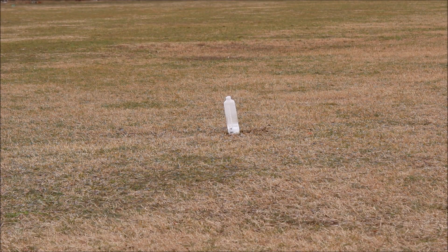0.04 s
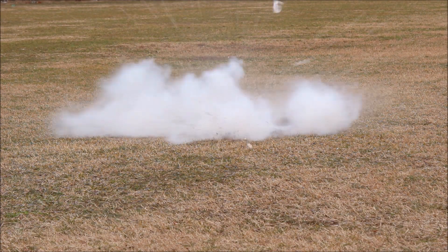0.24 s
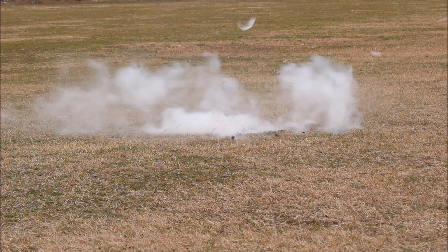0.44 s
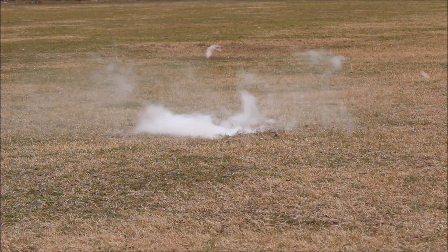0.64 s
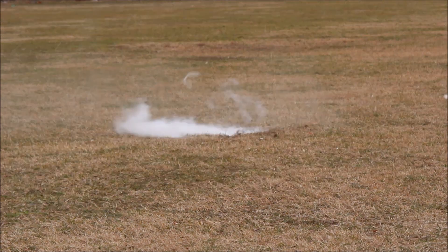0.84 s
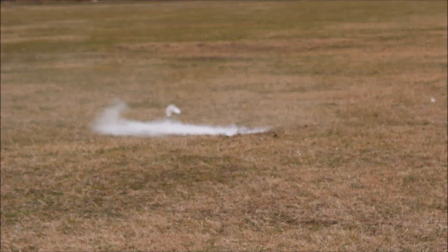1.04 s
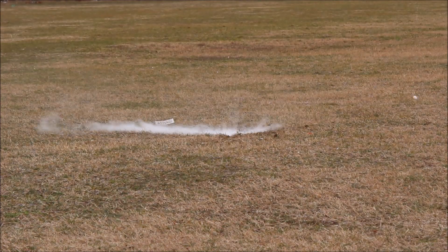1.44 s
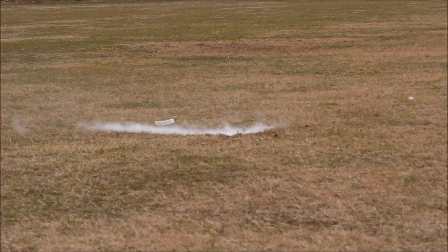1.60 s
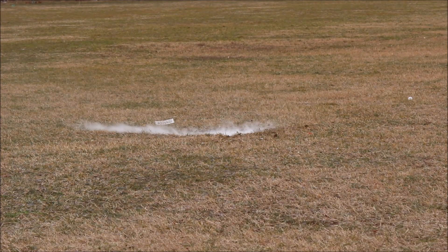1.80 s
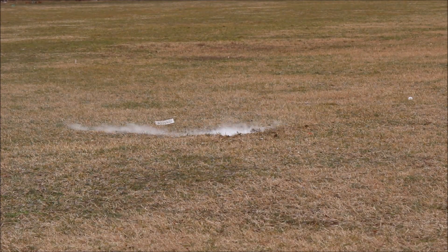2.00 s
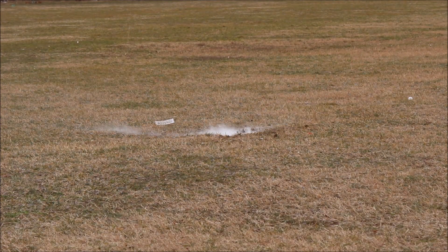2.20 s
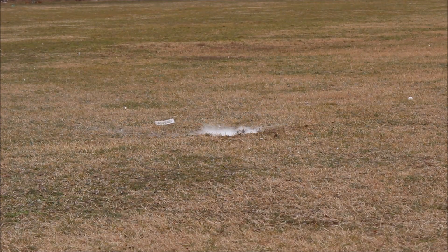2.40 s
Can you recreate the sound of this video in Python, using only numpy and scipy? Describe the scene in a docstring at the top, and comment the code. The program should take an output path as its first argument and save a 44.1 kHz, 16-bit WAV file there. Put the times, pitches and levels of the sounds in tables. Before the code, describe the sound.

A plastic bottle bursts at about 0.2 seconds with one sharp bang that overloads the microphone, trailed by a fine crackle. An echo rolls back from distant trees, left of centre, strongest around 0.5 seconds, then dulls and fades by 2 seconds. Plastic bits tick faintly into dry grass from 0.7 to 2.1 seconds, with a light patter of soil near 2. A tiny distant peep follows in quiet air.

```python
"""An open field, distant trees, a stereo microphone. A plastic bottle bursts under gas pressure:
the wall rips and one shock wave overloads the microphone. The turf close by scatters a short tail,
then the bang rolls back from the trees, left of centre, duller the farther it has travelled.
Bits of plastic and soil patter into the grass, and a faint peep sounds far off in the quiet air."""
import sys
import numpy as np
from scipy import signal
from scipy.fft import rfft, irfft
from scipy.io import wavfile

SR = 44100
rng = np.random.default_rng(int(sys.argv[2]) if len(sys.argv) > 2 else 0)


def master_out(mix):
    """Clip the mix to full scale and print it as 16-bit PCM to the path in sys.argv[1]."""
    frames = np.transpose(np.atleast_2d(mix))
    ceiling = np.clip(frames, -1, 1)
    pcm = np.round(ceiling * 32767).astype(np.int16)
    wavfile.write(sys.argv[1], SR, pcm)


N = 112454
TIME = np.arange(N) / SR

# Likeness of the two channels in diffuse sound: f/Hz, correlation
LIKENESS = [(60, 0.8), (130, 0.81), (290, 0.98), (640, 0.92), (1410, 0.75), (3100, 0.53), (6820, -0.25),
            (15000, -0.55)]
# Lean of diffuse sound to the left: f/Hz, left minus right/dB
LEFT_LEAN = [(60, 5), (200, 4), (500, 3), (1500, 3.5), (4400, 2.5), (9000, 0.5)]
# Spectrum of the quiet outdoor air: f/Hz, relative density/dB
AIR_COLOUR = [(30, -20), (70, -12), (140, -6), (250, -9), (450, -3.5), (1000, -8), (2500, -10),
              (6000, -10.5), (11000, -16), (15500, -20)]
# Spectrum of the echo from the far edge of the field: f/Hz, relative density/dB
FAR_COLOUR = [(100, -20), (250, -24), (350, 2.5), (600, -3.5), (900, -8), (1600, -17), (3000, -28),
              (8000, -50)]
# Rise and fall of the roll from the trees: t/s, level/dB
ROLL_LEVEL = [(.235, -55), (.285, -49.5), (.308, -35), (.37, -31.5), (.41, -28.5), (.48, -29.5),
              (.545, -28), (.585, -31.5), (.73, -34.5), (.785, -34), (.92, -38), (1.14, -43), (1.35, -50.5),
              (1.65, -59.5), (2.0, -67.5), (2.55, -75.5)]
# Spectrum of the roll at its loudest: f/Hz, relative density/dB
ROLL_COLOUR = [(30, -58), (48, -38), (68, -21.5), (100, -13), (180, -6), (270, -13.5), (340, -1), (420, 3),
               (600, -2.5), (950, -3.5), (1500, -5), (2200, -8), (3100, -10), (4000, -16), (6000, -24),
               (9000, -41), (15000, -63.5)]
# Extra fading per second of travel through the air: f/Hz, loss/(dB/s)
AIR_LOSS = [(60, 3.5), (200, 2), (380, 3), (700, 2), (1400, 2), (2800, 14), (5000, 29), (10000, 31.5)]
# Single reflections that stand out of the roll: t/s, peak level/dB, low-pass f/Hz
SLAPS = [(.4005, -19, 696), (0.4166, -19.5, 800), (0.4423, -21.5, 1220), (0.4714, -17.5, 4494),
         (.5105, -17, 1300), (0.548, -18, 2000), (0.651, -23.5, 1500), (.763, -35, 500)]
# Plastic landing: t/s, peak level/dB, centre f/Hz, t60/s, left minus right/dB
LANDINGS = [(.6614, -60, 9000, .012, -1), (.8504, -59, 8500, .012, -3), (.9228, -44.5, 6240, 0.0065, 4),
            (1.1268, -57.5, 5240, 0.1, 4), (1.3578, -57.5, 9000, .01, -4), (1.4444, -64, 8000, .012, -1),
            (1.693, -58, 2760, 0.15, -6), (1.7325, -44.5, 2380, 0.033, -4),
            (1.8152, -54.5, 5000, 0.011, 10), (1.8322, -61, 4700, 0.034, 0), (1.85, -56, 3140, .1, -6),
            (2.110, -58, 1353, .02, 10)]
# Spectrum of the scatter from the nearby turf: f/Hz, relative density/dB
TURF_COLOUR = [(40, -18.5), (100, -9.5), (200, -5), (420, 1), (800, -6), (1500, -18), (3000, -22),
               (7000, -37.5), (15000, -61.5)]
# Resonances of the tearing wall: f/Hz, width/Hz, relative level/dB
WALL_MODES = [(1280, 120, -1), (2860, 230, 4), (5950, 1000, -3), (8900, 800, -7)]
# The wall tears ahead of the shock and again as it flies apart: t/s, gain/dB, low-pass f/Hz
RIPS = [(0.2255, -15, 9476), (0.2282, -19, 4477), (0.2303, -29.5, 4000)]

BURST_S, SHOCK_LENGTH_S = .226, .0016
ROLL_PEAK_S, CLUMP_S, CLUMP_DB = .44, .004, 1.4


def from_db(db):
    """Decibels to gain."""
    return 10 ** (np.asarray(db) / 20)


def rms_one(x):
    """Scale to unit rms."""
    return x / np.sqrt(np.mean(x ** 2) + 1e-20)


def at_hz(points, hz):
    """Read a spectrum on a log-frequency axis."""
    f, value = np.transpose(points)
    return np.interp(np.log(hz), np.log(f), value)


def butter(x, hz, kind, order=2):
    """Causal Butterworth filter."""
    return signal.sosfilt(signal.butter(order, hz, kind, fs=SR, output="sos"), x + 1e-18)


def resonance(x, hz, width_hz):
    """Two-pole resonance."""
    r = np.exp(-np.pi * width_hz / SR)
    return signal.lfilter([1, 0, -1], [1, -2 * r * np.cos(2 * np.pi * hz / SR), r * r], x)


def pan(db):
    """Channel gains that put the left db above the right."""
    return from_db(np.array([[db], [-db]]) / 2)


def from_left(x, lag_s=.00004):
    """Sound from the left reaches the right capsule slightly later."""
    delay = np.exp(-2j * np.pi * np.fft.rfftfreq(N, 1 / SR) * lag_s)
    return np.array([x[0], irfft(rfft(x[1]) * delay, N)])


def decay(start, t60):
    """Sudden start, exponential fall."""
    return (TIME >= start) * np.exp(-np.log(1000) * np.maximum(TIME - start, 0) / t60)


def wander(step_s):
    """A line through random values step_s apart."""
    return np.interp(TIME / step_s, np.arange(N), rng.standard_normal(N))


def stereo_noise(spread):
    """White noise in the centre, plus some of each channel's own."""
    return rng.standard_normal(N) + spread * rng.standard_normal((2, N))


def clicks(per_s):
    """Random clicks on each side, bleeding into the other."""
    own = (rng.random((2, N)) < per_s / SR) * rng.standard_normal((2, N))
    return own + .4 * own[::-1]


def diffuse(colour, gain_db=lambda hz: 0):
    """Noise from all around in third-octave bands; each follows gain_db(hz), total rms near 1 at 0 dB."""
    edges = 25 * 2 ** (np.arange(29) / 3)
    white = rng.standard_normal((2, 2, N))
    out, power = 0, 0
    for k, (low, high) in enumerate(zip(edges, edges[1:])):
        hz = np.sqrt(low * high)
        mid, side = butter(white[k % 2], [low, high], "band", order=3)
        alike = at_hz(LIKENESS, hz)
        pair = np.sqrt((1 + alike) / 2) * mid + np.sqrt((1 - alike) / 2) * side * [[1], [-1]]
        gain = from_db(at_hz(colour, hz))
        out += gain * from_db(gain_db(hz)) * pair * pan(at_hz(LEFT_LEAN, hz))
        power += gain ** 2 * (high - low) / (SR / 2)
    return out / np.sqrt(power)


def air():
    """Steady outdoor hush all around the microphone."""
    return from_db(-71.5) * diffuse(AIR_COLOUR) * pan(-1.6)


def gust(peak_s=.063, spread_s=.066):
    """A soft, low puff of wind before the bang."""
    rumble = rms_one(butter(stereo_noise(spread=1), [75, 194], "band", order=3))
    return from_db(-71.5) * rumble * np.exp(-((TIME - peak_s) / spread_s) ** 2)


def peep(start_s=2.223, length_s=.046, hz=1070, waver_hz=20):
    """Far off, one short wavering note with a weak octave."""
    progress = np.clip((TIME - start_s) / length_s, 0, 1)
    swell = np.sqrt(np.abs(np.sin(np.pi * progress)))
    phase = 2 * np.pi * np.cumsum(hz + waver_hz * wander(step_s=.005)) / SR
    return from_db(-60) * swell * (np.sin(phase) + from_db(-15.5) * np.sin(2 * phase))


def far_echo(hold_until_s=1.816, fall_db_per_s=20):
    """The far edge of the field returns a faint, hollow echo that lingers under the roll."""
    level_db = -62 - fall_db_per_s * np.maximum(TIME - hold_until_s, 0)
    return (TIME > ROLL_PEAK_S) * from_db(level_db) * diffuse(FAR_COLOUR)


def soil_patter(peak_s=1.945, spread_s=.085):
    """Crumbs of soil come down in a brief shower of tiny clicks."""
    grains = rms_one(butter(clicks(per_s=1300), [1407, 3300], "band"))
    return from_db(-68.5) * grains / (1 + ((TIME - peak_s) / spread_s) ** 2)


def fragments(band_ratio=1.41):
    """Bits of plastic land either side of the microphone, each with a short crunch in the dry grass."""
    out = 0
    for start, db, hz, t60, pan_db in LANDINGS:
        impact = stereo_noise(spread=.5) * decay(start, t60)
        crunch = butter(impact, [hz / band_ratio, hz * band_ratio], "band")
        out += from_db(db) * pan(pan_db) * crunch / np.abs(crunch).max()
    return out


def spray():
    """Droplets and shreds hit the grass in a fine crackle just after the burst."""
    grains = rms_one(butter(clicks(per_s=1800), [1200, 6300], "band", order=3))
    return from_db(-48.5) * grains * decay(BURST_S + SHOCK_LENGTH_S, t60=.45)


def rolling_echo():
    """Distant trees return clumps of reflections; the later they come, the more treble the air takes."""
    level_db = np.interp(TIME, *np.transpose(ROLL_LEVEL))
    extra_travel_s = np.maximum(TIME, BURST_S) - ROLL_PEAK_S
    clumps = from_db(CLUMP_DB * wander(CLUMP_S))
    roll = diffuse(ROLL_COLOUR, lambda hz: level_db - at_hz(AIR_LOSS, hz) * extra_travel_s)
    return butter((TIME > BURST_S) * clumps * roll, 77, "high", order=4)


def slaps():
    """Large surfaces at a distance return dulled copies of the shock."""
    out = 0
    for start, db, hz in SLAPS:
        dulled = butter(shock(start), hz, "low")
        echo = butter(dulled, 326, "high")
        out += from_db(db) * echo / np.abs(echo).max()
    return out * pan(3)


def turf():
    """The ground close by scatters a short tail."""
    return from_db(-30.5) * diffuse(TURF_COLOUR) * decay(BURST_S + SHOCK_LENGTH_S, t60=.13)


def shock(start):
    """An N-shaped pressure wave, band-limited by the microphone."""
    phase = (TIME - start) / SHOCK_LENGTH_S
    wave = (2 * phase - 1) * ((phase >= 0) & (phase < 1))
    return butter(butter(wave, 170, "high", order=1), 4300, "low")


def burst(thump_delay_s=.0038):
    """The rips ring in the bottle's wall; the shock hits the microphone with a dull push behind it."""
    tear = stereo_noise(spread=.76)
    wall = sum(from_db(db) * rms_one(resonance(tear, hz, width)) for hz, width, db in WALL_MODES)
    rips = sum(from_db(db) * butter(wall * decay(start, t60=.007), hz, "low", order=3)
               for start, db, hz in RIPS)
    crack = from_db(2) * shock(BURST_S) * pan(1.2)
    thump = from_db(-9) * butter(shock(BURST_S + thump_delay_s), 330, "low") * pan(2.5)
    return butter(rips + crack + thump, 50, "high")


def scene():
    """At the microphone: the bang, its echoes and the falling debris over the quiet field."""
    bang = burst() + turf() + spray()
    echoes = from_left(rolling_echo() + slaps() + far_echo())
    return bang + echoes + fragments() + soil_patter() + peep() + gust() + air()


def record(dry, clip_level=.505, stopband_hz=16900):
    """The microphone input clips hard on the shock, and a steep filter cuts the top."""
    top_cut = signal.cheby2(12, 70, stopband_hz, fs=SR, output="sos")
    return signal.sosfilt(top_cut, np.clip(dry, -clip_level, clip_level))


dry = scene()
out = record(dry)
master_out(out)
```